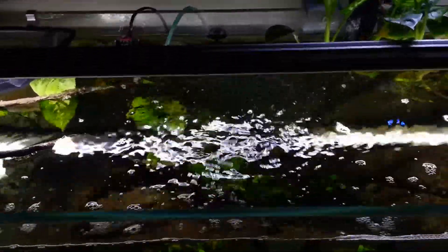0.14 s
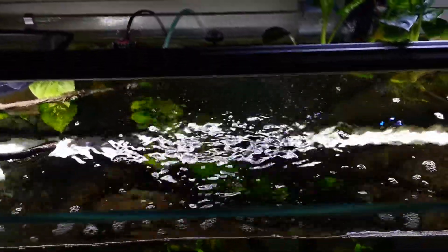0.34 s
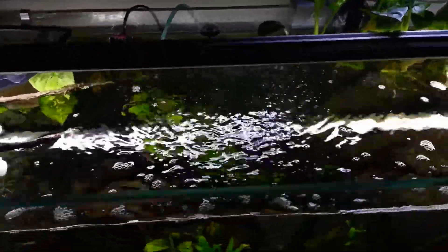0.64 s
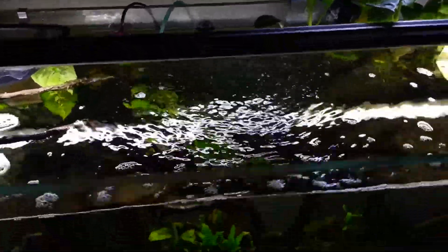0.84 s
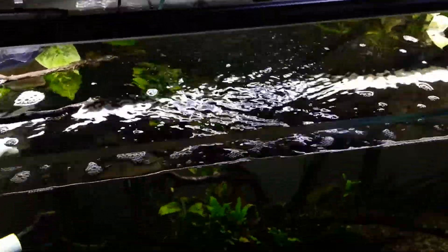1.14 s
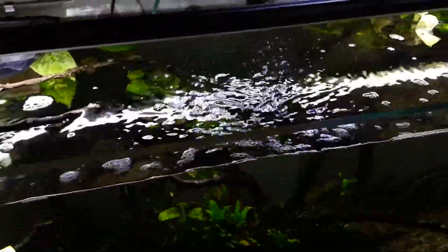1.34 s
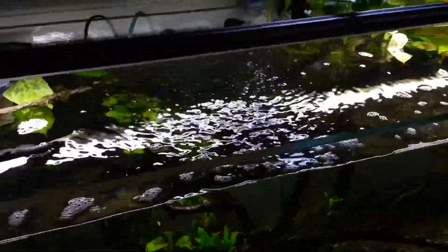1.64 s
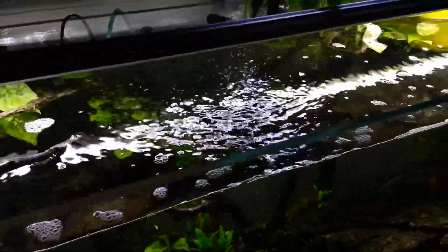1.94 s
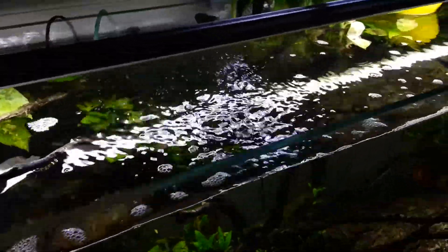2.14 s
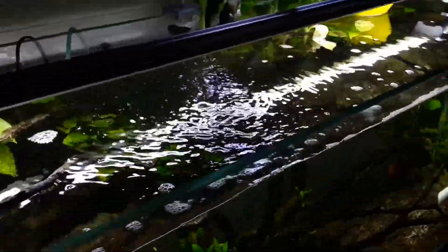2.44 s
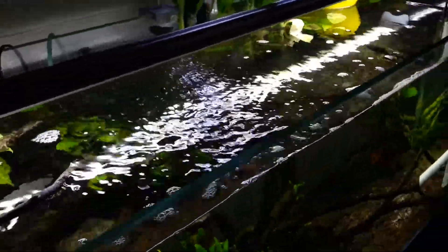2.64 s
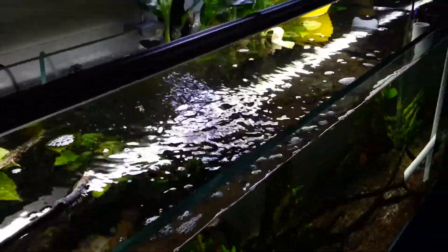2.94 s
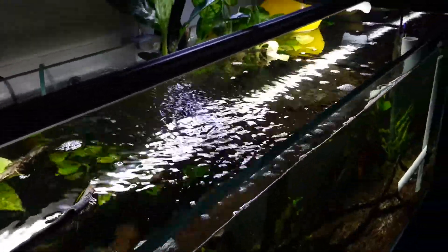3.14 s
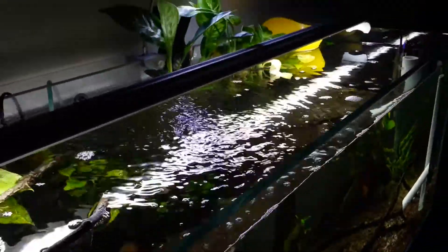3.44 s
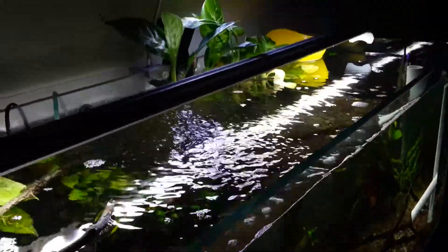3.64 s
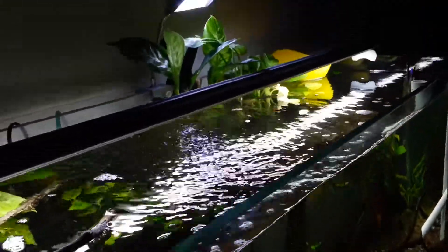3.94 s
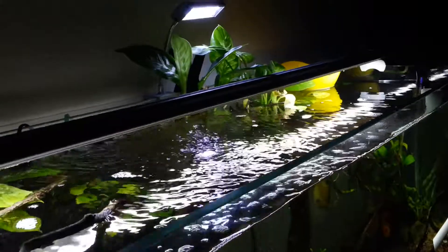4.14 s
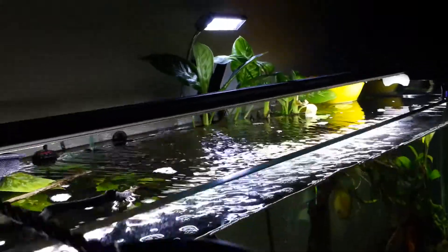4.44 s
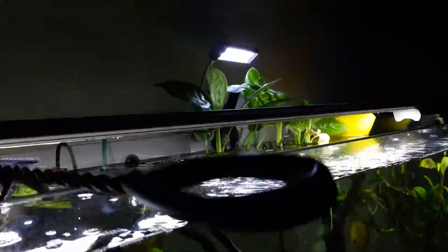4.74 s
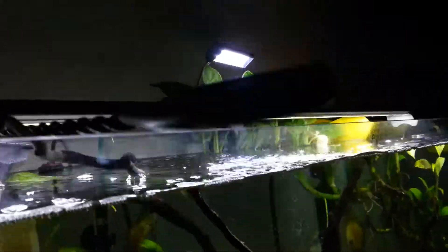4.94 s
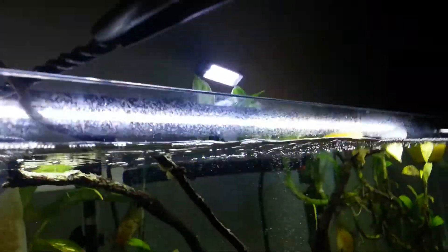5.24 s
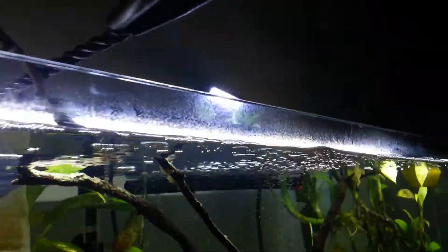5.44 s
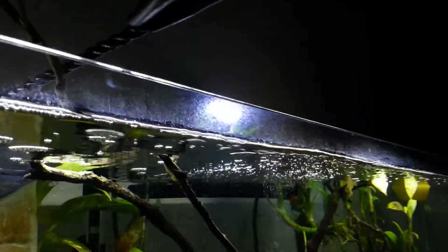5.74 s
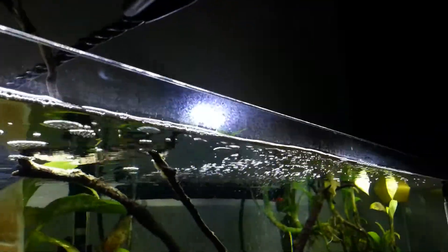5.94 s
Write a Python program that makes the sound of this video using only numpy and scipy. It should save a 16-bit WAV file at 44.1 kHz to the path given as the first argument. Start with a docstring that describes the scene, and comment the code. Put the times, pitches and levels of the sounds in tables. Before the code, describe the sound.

Close above an aquarium, a filter outflow churns the surface: fine, fluttering spray and coarser babble over a quiet, steady pump hum and low rumble. Sharp drops tick on both sides and soft air pockets plop, one crisp drop near 0.1 s. The patter strengthens around 1 s, and at 1.8 s a small splash with a slap fizzes briefly. A very faint, hissy whistle hangs from about 2.2 s while the flow falters and catches. At 3.1 s a quick string of low glugs runs on the right, then a short swish at 3.4 s. At 4.3 s a far harder slap cracks, with a fizzing tail. By 4.9 s the surface is almost calm. Hollow, boomy bumps strike in pairs at 5.5 and 5.9 s, with plops, glassy splashes and renewed churning; the tank wall groans unsteadily until the end at about 6.1 s.

```python
"""Over a steady pump hum and low rumble, a filter outflow churns an aquarium: spray patters, drops tick, air plops.
A splash with a slap comes before two seconds, then a thin whistle, a string of glugs and a brief swish.
A much harder slap with a long fizzing tail follows after four seconds, and the surface then calms.
Near the end, two close pairs of hollow bumps shake air loose amid more splashes, and the tank wall groans.
Water sounds are filtered noise and grains; air pockets and solid parts ring as decaying tones."""
import sys
import numpy as np
from scipy import signal
from scipy.fft import rfft, irfft
from scipy.io import wavfile
from scipy.ndimage import map_coordinates

SR = 44100
rng = np.random.default_rng(int(sys.argv[2]) if len(sys.argv) > 2 else 0)


def unload_wav(signal):
    """Save mono or channel-first audio to the path in sys.argv[1] as 16-bit WAV at rate SR, clipped to [-1, 1]."""
    wavfile.write(
        sys.argv[1],
        SR,
        np.round(np.clip(np.atleast_2d(signal).T, -1, 1) * 32767).astype(np.int16),
    )


N = 268128
TIME = np.arange(N) / SR  # s

# Levels below are starting levels: gains and filters act on them later. Positive left-right dB leans left.
# How hard the outflow churns the surface: t/s, fine spray level/dB, coarser babble level/dB
CHURN_CURVE = [(0, -54.5, -65), (0.66, -59.5, -68.5), (0.9, -55, -58.5), (1.1, -51.5, -58.5),
               (1.52, -59.5, -62), (1.8, -50, -63.5), (2.25, -59, -67), (2.5, -57.5, -64),
               (2.7, -59, -66.5), (2.92, -64.5, -68.5), (3.15, -57.5, -61), (3.3, -60, -64),
               (4.0, -58, -63), (4.68, -64.5, -59.5), (4.9, -84, -79.5), (5.17, -75, -69.5),
               (5.26, -68, -60), (6.08, -54, -49)]
# Moments when the flow falters, then catches again: t/s of the catch, lull depth/dB
FLOW_FALTERS = [(2.068, 20), (2.135, 12), (2.502, 14), (2.565, 15), (3.667, 18), (4.135, 7)]
# Larger drops on the surface: t/s, level/dB, left-right/dB
LARGE_DROPS = [(0.0547, -56, -16), (0.0832, -29.5, -6), (0.9765, -37.5, 17), (1.22, -31, 16),
               (1.34, -37.5, 11), (1.3665, -34.5, 2), (1.5394, -35, 8), (1.67, -38.5, 1),
               (1.7688, -26.5, -16), (2.349, -38, 5), (2.503, -45, 4), (2.572, -42.5, 32.5),
               (2.6932, -33.5, 5), (2.986, -49, -29), (3.028, -47, -25), (3.101, -30.5, 8.5),
               (3.228, -37, -17), (3.61, -35, -5), (3.667, -47, -6), (4.148, -33.5, -3), (4.205, -29.5, 0),
               (4.277, -33.5, 19), (4.692, -42, -11)]
# Larger air pockets: t/s, level/dB, f/Hz, left-right/dB
LARGE_POCKETS = [(0.091, -38, 227, 11), (0.118, -38.5, 229, 12.5), (0.853, -42.5, 200, 7),
                 (1.132, -43, 272, 13), (1.344, -38, 343, 10.5), (1.65, -42.5, 254, 3),
                 (2.285, -38, 204, 10), (2.299, -42, 640, -18), (2.324, -41.5, 467, 7),
                 (2.499, -42.5, 480, -9), (2.635, -42, 200, 11.5), (2.76, -46.5, 195, -7),
                 (2.832, -43.5, 324, -9), (2.855, -48, 201, -11), (2.946, -42, 195, 11),
                 (2.983, -38.5, 312, -11.5), (3.757, -46, 306, 3), (4.32, -31.5, 331, 1.5),
                 (4.634, -43.5, 190, 8.5)]
# Sharp slaps of water: t/s, level/dB, left-right/dB
WATER_SLAPS = [(1.786, -32, -3), (4.3223, -3, 2)]
# Splashes: t/s, level/dB, swell/s, hold/s, t60/s (time to fall 60 dB), left-right/dB,
# low wash level/dB and ringing of the glass level/dB, both relative to the splash
SPLASH_EVENTS = [(1.782, -39, 0.071, 0.01, 0.42, -1, -16, -14),
                 (1.927, -50, 0.056, 0.02, 0.23, -3, -36, -17),
                 (4.321, -29.5, 0.065, 0.033, 0.79, -0.5, -16.5, -19),
                 (5.011, -59, 0.035, 0.013, 0.21, -4.5, -12, -12),
                 (5.376, -58, 0.14, 0.023, 0.3, 1, -4, -6), (5.519, -36, 0.029, 0.088, 0.84, 3, -2.5, 1.5),
                 (5.872, -37, 0.0033, 0.0097, 0.59, 3.5, -20.5, -7),
                 (5.983, -44, 0.05, 0.015, 0.52, -1, -15.5, 0.5)]
# Bumps against the tank: t/s, level/dB, hold/s, t60/s, low limit f/Hz, ring level/dB relative to the bump
TANK_BUMPS = [(5.505, -27, 0.0087, 0.43, 55, -11), (5.582, -40, 0.0078, 0.91, 115, -7.5),
              (5.87, -24.5, 0.0055, 0.28, 196, -8.5), (5.915, -32.5, 0.052, 0.56, 229, -6.5)]
# Groan of the tank wall around the last bumps: t/s, f/Hz, level/dB
WALL_GROAN = [(5.86, 205, -71), (5.895, 203.8, -37), (5.927, 190.5, -25.5), (5.96, 298, -38),
              (5.995, 303.4, -32), (6.04, 253, -30.5), (6.08, 229, -52)]

# Low tones in which the tank rings: f/Hz, level/dB, t60/s
TANK_MODES = [(130.4, -18, 0.58), (206.6, 2.5, 0.39), (247, -16, 0.55), (315, -18, 0.24), (359, -4.5, 0.21),
              (588, -24, 0.12), (713, -12, 0.14)]
# High tones in which its glass rings: f/Hz, level/dB, t60/s
GLASS_MODES = [(1162, -10, 0.017), (2113, -19.5, 0.05), (2902, -10, 0.068), (3390, -11.5, 0.028),
               (4980, -11.5, 0.1), (5400, -11.5, 0.055), (6080, -10.5, 0.015), (6713, -7, 0.036),
               (7700, -21, 0.056)]
# Steady tones of the pump: f/Hz, level/dB (rms)
PUMP_TONES = [(60, -71), (120, -79.5), (180, -68), (300, -81), (361, -78.5), (598, -90.5), (780, -93.5)]

# Spectrum of the fine spray: f/Hz, level/dB
SPRAY_SPECTRUM = [(1800, -43), (3000, -10.5), (4200, -9.5), (4900, -5.5), (5500, -0.5), (6300, -0.5),
                  (7150, 1), (8700, -6.5), (11000, -6), (14000, -9.5), (15500, -33)]
# Spectrum of the coarser babble: f/Hz, level/dB
BABBLE_SPECTRUM = [(290, -29.5), (500, -3.5), (756, -2.5), (829, -5.5), (892, -6.5), (1790, -5.5),
                   (2790, -3.5), (3640, -8.5), (4500, -3), (5850, -38), (9900, -120)]
# Spectrum of the fizz of a splash: f/Hz, level/dB
FIZZ_SPECTRUM = [(600, -14), (1000, -18), (1450, -3), (2100, -1.5), (2900, 3), (3600, -1), (4500, -5),
                 (5600, 2), (6800, 2), (8500, -11), (11000, -16.5), (15000, -96)]
# Spectrum of the low wash under a splash: f/Hz, level/dB
WASH_SPECTRUM = [(24, -26), (40, -10), (65, -0.5), (87, -16), (177, -1), (455, -5), (497, -8.5),
                 (1300, -16.5), (1690, -48.5), (2860, -120)]
# Spectrum of the swish of water: f/Hz, level/dB
SWISH_SPECTRUM = [(900, -24), (1700, -21.5), (2250, -11), (2700, -12), (4300, -19), (6000, -15),
                  (7000, -11), (8200, -23.5), (12000, -24), (15000, -59)]
# Spectrum of a slap: f/Hz, level/dB
SLAP_SPECTRUM = [(300, -23), (1100, -23), (1750, 2), (2600, -4), (4200, -11), (5600, 4), (6600, -2),
                 (8200, -15), (14000, -30)]
# Spectrum of the boom of a bump: f/Hz, level/dB
BOOM_SPECTRUM = [(30, -17), (65, -4), (90, -12), (125, -2), (200, -3.5), (290, -0.5), (370, -1.5),
                 (470, -9.5), (620, -7.5), (780, -20.5), (960, -31), (1500, -39), (2500, -65)]
# Spectrum of the rumble under the hum: f/Hz, level/dB
RUMBLE_SPECTRUM = [(20, -12.5), (45, -7.5), (65, 0.5), (90, -12), (130, -8.5), (180, -4), (240, -7),
                   (340, -5), (450, -14.5), (800, -19), (1300, -20.5), (2500, -27.5)]
# How splashes divide between the sides: f/Hz, left-right/dB
SPLASH_BALANCE = [(700, -7), (1300, 1.5), (2400, 9.5), (4400, 10), (6000, -2), (8000, -6), (14000, -4)]
# How spray divides between the sides: f/Hz, left-right/dB
SPRAY_BALANCE = [(60, -16), (110, 21), (200, -7), (380, 2.5), (700, 4.5), (1290, 4), (2380, 9.5),
                 (4400, 9.5), (8120, -10), (15000, 1)]

# How fast the flow sinks before it catches, and the size and length of the spurt after
SAG_S, SPURT_DB, SPURT_S = .028, 2, .02
# Every larger drop throws up a puff of spray, weaker than the drop
PUFF_DB, PUFF_SWELL_S, PUFF_T60_S = -20, .015, .14
# Small drops fall at random
SMALL_DROPS_PER_S, SMALL_DROP_OVER_SPRAY_DB, DROP_SIDE_SPREAD_DB = 3, 14, 9
# A string of air pockets glugs out on the right, tending to sink in pitch
GLUG_START_S, GLUG_GAP_S, GLUG_DB, GLUG_SIDE_DB = 3.072, .021, -38.5, -14.5
GLUG_FIRST_HZ, GLUG_LAST_HZ, GLUG_FADE_DB = 367, 220, 4
# Small pockets burst at random within this span
SMALL_PLOP_SPAN_S, SMALL_PLOP_DB, SMALL_PLOP_HZ, PLOP_SIDE_SPREAD_DB = (0.94, 3.7), -53, 215, 11.5
# Each bump shakes a big pocket loose
BUMP_PLOP_OVER_DB, BUMP_PLOP_HZ = 4, 335
SLAP_T60_S, SPLASH_FLUTTER_DB = .006, .7
SWISH_S, SWISH_LEVEL_DB = 3.375, -46.5
SWISH_SWELL_S, SWISH_HOLD_S, SWISH_T60_S = .14, .088, .2
WHISTLE_S, WHISTLE_LEVEL_DB, WHISTLE_HZ = 2.2, -72, 4270
WHISTLE_SWELL_S, WHISTLE_HOLD_S, WHISTLE_T60_S = .3, .55, 1.2
WHISTLE_RING_S = .028  # the shorter it rings, the more like a hiss
CUTOFF_HZ = 14650


def from_db(db):
    """Decibels to gain."""
    return 10 ** (np.asarray(db) / 20)


def rms_one(x):
    """Scale to an rms (average strength) of one."""
    return x / np.sqrt(np.mean(x ** 2) + 1e-20)


def in_time(rows):
    """Each column of a curve, sample by sample."""
    s, *columns = np.transpose(rows)
    return [np.interp(TIME, s, column) for column in columns]


def pan(db):
    """Left and right gains for a level difference."""
    return from_db(np.array([[.5], [-.5]]) * db)


def drift(rate):
    """Smooth random wander of spread 1, through `rate` random points per second."""
    knots = rng.standard_normal(4000)
    wander = map_coordinates(knots, [TIME[::20] * rate], order=3, mode="wrap")
    return rms_one(wander).repeat(20)[:N]


def colour(x, spectrum, sides=((100, 0), (1000, 0))):
    """Filter of unit power gain with the given spectrum and left-right balance, with no sound ahead of time."""
    size = 4096
    log_hz = np.log(np.maximum(np.arange(size // 2 + 1) * SR / size, 1))
    curves = [np.transpose(points) for points in (spectrum, sides)]
    level_db, side_db = [np.interp(log_hz, np.log(hz), db) for hz, db in curves]
    # folding the cepstrum (spectrum of the log spectrum) makes the filter respond as early as it can
    cepstrum = irfft(np.log(from_db(level_db) * pan(side_db)))
    cepstrum[:, 1:size // 2] *= 2
    cepstrum[:, size // 2 + 1:] = 0
    response = rms_one(irfft(np.exp(rfft(cepstrum)))) / np.sqrt(size)
    return signal.fftconvolve(x * np.ones((2, 1)), response, axes=1)[:, :N]


def stereo_noise(alike):
    """White noise; `alike` is the share of power common to the two sides."""
    shared = np.sqrt(alike) * rng.standard_normal(N)
    return shared + np.sqrt(1 - alike) * rng.standard_normal((2, N))


def grains(per_s, spread_db):
    """Tiny clicks of uneven size at random moments, reaching each side with its own strength."""
    born = rng.random(N) < per_s / SR
    sizes = from_db(spread_db * np.minimum(rng.exponential(1, N), 4))
    return rms_one(born * sizes * rng.standard_normal((2, N)))


def ring(x, hz, t60):
    """One mode: x sets off a tone that falls 60 dB in t60 seconds."""
    r, w = from_db(-60 / (t60 * SR)), 2 * np.pi * hz / SR
    return signal.lfilter([0, np.sin(w)], [1, -2 * r * np.cos(w), r * r], x + 1e-18)


def fade(age, t60):
    """Gain that falls 60 dB in t60 seconds."""
    return np.exp(-np.log(1000) * age / t60)


def surge(s, swell, hold, t60):
    """Gain that swells by 30 dB per swell time up to time s, holds, then dies away."""
    rise_db = -30 * np.maximum(s - TIME, 0) / swell
    fall_db = -60 * np.maximum(TIME - s - hold, 0) / t60
    return from_db(np.maximum(rise_db + fall_db, -200))


def cracks(rows, t60, tail_db, tail_t60, rise_s):
    """Very short bursts of random signs, each with a scatter of noise that dies away."""
    out, age = np.zeros((2, N + SR)), np.arange(SR // 5) / SR
    burst, scatter = fade(age, t60), from_db(tail_db) * fade(age, tail_t60)
    attack = 1 - np.exp(-age / rise_s)
    for s, level_db, side_db in rows:
        at = round(s * SR)
        crack = burst * rng.choice([-1, 1], (2, len(age)))
        crack = crack + scatter * rng.standard_normal((2, len(age)))
        out[:, at:at + len(age)] += from_db(level_db) * pan(side_db) * attack * crack
    return out[:, :N]


def pump(rumble_db=-64.5, waver_db=1.0, phase_waver=0.41):
    """Mains hum that wavers a little in level and phase, in a low rumble that follows the churning."""
    hum = 0
    for hz, level_db in PUMP_TONES:
        gain = from_db(level_db + waver_db * drift(20)) * np.sqrt(2)
        hum = hum + gain * np.sin(2 * np.pi * hz * TIME + phase_waver * drift(3.09))
    spray_db = in_time(CHURN_CURVE)[0]
    follow_db = 0.15 * (spray_db - np.median(spray_db))
    rumble = from_db(rumble_db + follow_db + 4.4 * drift(35)) * stereo_noise(0.55)
    return hum + colour(rumble, RUMBLE_SPECTRUM)


def whistle(waver_db=2):
    """A thin, unsteady whistle in the outflow: noise through one narrow mode swells, holds and fades."""
    gain = from_db(WHISTLE_LEVEL_DB + waver_db * drift(24.83))
    gain = gain * surge(WHISTLE_S, WHISTLE_SWELL_S, WHISTLE_HOLD_S, WHISTLE_T60_S)
    return gain * rms_one(ring(stereo_noise(0.068), WHISTLE_HZ, WHISTLE_RING_S))


def groan():
    """The tank wall groans: a tone of gliding, unsteady pitch and level."""
    hz, level_db = in_time(WALL_GROAN)
    gain = from_db(level_db + 2.9 * drift(70))
    turns = np.cumsum(hz * (1 + 0.08 * drift(90))) / SR
    return gain * np.sin(2 * np.pi * turns) * (TIME > WALL_GROAN[0][0])


def bumps(judder_db=0.0):
    """Each bump is a sudden push of noise that booms in the tank and leaves its modes ringing."""
    boom, drive = 0, 0
    for s, level_db, hold, t60, low_hz, ring_db in TANK_BUMPS:
        # a judder of 0 dB leaves the push steady
        gain = from_db(level_db + judder_db * drift(130))
        push = gain * surge(s, 0.00067, hold, t60) * stereo_noise(0.83)
        no_bass = signal.butter(2, low_hz, "high", fs=SR, output="sos")
        boom = boom + signal.sosfilt(no_bass, push)
        drive = drive + from_db(ring_db) * push
    rings = sum(from_db(level_db) * rms_one(ring(drive, hz, t60)) for hz, level_db, t60 in TANK_MODES)
    return colour(boom, BOOM_SPECTRUM) + from_db(0.5) * np.std(drive) * rings + groan()


def glass_ringing():
    """Steady noise sets the high modes of the glass ringing, each with its own place between the sides."""
    side_hz, side_db = np.transpose(SPLASH_BALANCE)
    glass = 0
    for hz, level_db, t60 in GLASS_MODES:
        mode = pan(np.interp(hz, side_hz, side_db)) * ring(stereo_noise(0.045), hz, t60)
        glass = glass + from_db(level_db) * rms_one(mode)
    return glass


def slaps():
    """Each slap of water is a sharp burst of noise, over within a few milliseconds."""
    bursts = cracks(WATER_SLAPS, t60=SLAP_T60_S, tail_db=0, tail_t60=SLAP_T60_S, rise_s=.0005)
    return colour(bursts, SLAP_SPECTRUM, SPLASH_BALANCE)


def swish():
    """A brief swish of water: dense grains swell, hold and fall away."""
    gain = from_db(SWISH_LEVEL_DB) * surge(SWISH_S, SWISH_SWELL_S, SWISH_HOLD_S, SWISH_T60_S)
    return colour(gain * grains(per_s=4900, spread_db=1), SWISH_SPECTRUM, SPRAY_BALANCE)


def splashes(steady_glass_db=-8):
    """Dense fizz of falling spray above a low wash, with slaps and a swish; all the water rings the glass."""
    fizz, wash = 0, 0
    on_glass = from_db(in_time(CHURN_CURVE)[1] + steady_glass_db)
    for s, level_db, swell, hold, t60, side_db, wash_db, glass_db in SPLASH_EVENTS:
        gain = from_db(level_db) * surge(s, swell, hold, t60)
        # hypot adds the powers of overlapping splashes
        fizz = np.hypot(fizz, gain * pan(side_db))
        wash = np.hypot(wash, gain * from_db(wash_db))
        on_glass = np.hypot(on_glass, gain * from_db(glass_db))
    fizz = fizz * from_db(SPLASH_FLUTTER_DB * drift(120)) * grains(per_s=22000, spread_db=1)
    solid = on_glass * glass_ringing() + slaps() + swish()
    return solid + colour(fizz, FIZZ_SPECTRUM, SPLASH_BALANCE) + colour(wash * stereo_noise(0.78), WASH_SPECTRUM)


def glug(count=10, jitter_s=0.00397, spread_db=2.0, pitch_spread=0.29):
    """A quick, uneven string of air pockets that tends to weaken: t/s, level/dB, f/Hz, left-right/dB."""
    late, loud, high = rng.standard_normal((count, 3)).T
    times = GLUG_START_S + GLUG_GAP_S * np.arange(count) + jitter_s * late
    levels = GLUG_DB - np.linspace(0, GLUG_FADE_DB, count) + spread_db * loud
    pitches = np.geomspace(GLUG_FIRST_HZ, GLUG_LAST_HZ, count) * np.exp(pitch_spread * high)
    return [(s, level_db, hz, GLUG_SIDE_DB) for s, level_db, hz in zip(times, levels, pitches)]


def small_plops(count=9, pitch_spread=0.13):
    """Faint air pockets at random moments: t/s, level/dB, f/Hz, left-right/dB."""
    times = rng.uniform(*SMALL_PLOP_SPAN_S, count)
    high, side = rng.standard_normal((count, 2)).T
    pitches = SMALL_PLOP_HZ * np.exp(pitch_spread * high)
    sides = PLOP_SIDE_SPREAD_DB * side
    return [(s, SMALL_PLOP_DB, hz, side_db) for s, hz, side_db in zip(times, pitches, sides)]


def air_pockets():
    """All pockets: large, glugging, small, and those shaken loose by the bumps."""
    shaken = [(s, level_db + BUMP_PLOP_OVER_DB, BUMP_PLOP_HZ, 0) for s, level_db, *_ in TANK_BUMPS]
    return LARGE_POCKETS + glug() + small_plops() + shaken


def plops(cycles=5.5, splat_db=-10, splat_t60=0.082, thud_db=-12, thud_hz=120, gain_db=-1.5):
    """Each air pocket rings for a few cycles, rising in pitch, inside a short dull splat and a soft thud."""
    out, age = np.zeros((2, N + SR)), np.arange(SR // 8) / SR
    dull = signal.butter(2, [110, 700], "band", fs=SR, output="sos")
    thud = 2 * from_db(thud_db) * np.sin(2 * np.pi * thud_hz * age) * np.exp(-age / 0.0024)
    for s, level_db, hz, side_db in air_pockets():
        swell = (1 - np.exp(-age / 0.0028)) * fade(age, cycles / hz)
        tone = 2 * swell * np.sin(2 * np.pi * hz * age * (1 + 6 * age))
        splat = rms_one(signal.sosfilt(dull, rng.standard_normal(len(age)))) * fade(age, splat_t60)
        plop = tone + thud + from_db(splat_db) * splat
        at = round(s * SR)
        out[:, at:at + len(age)] += from_db(level_db + gain_db) * pan(side_db) * plop
    return out[:, :N]


def churning():
    """Levels of spray and babble in dB: each falter sinks into a lull and ends in a short spurt."""
    dip_db = 0
    for s, depth_db in FLOW_FALTERS:
        away = np.abs(TIME - s)
        lull_db, spurt_db = -depth_db * np.exp(-away / SAG_S), SPURT_DB * np.exp(-away / SPURT_S)
        dip_db = dip_db + np.where(TIME < s, lull_db, spurt_db)
    return [level_db + dip_db for level_db in in_time(CHURN_CURVE)]


def small_drops():
    """Drops at random moments, stronger where the spray is: t/s, level/dB, left-right/dB."""
    spray_db = in_time(CHURN_CURVE)[0]
    at = np.flatnonzero(rng.random(N) < SMALL_DROPS_PER_S / SR)
    side_db = DROP_SIDE_SPREAD_DB * rng.standard_normal(N)
    return list(zip(TIME[at], spray_db[at] + SMALL_DROP_OVER_SPRAY_DB, side_db[at]))


def tiny_bubbles():
    """Tiny bubbles ping: sparse grains set off tones that die away within 45 cycles."""
    pitches = np.geomspace(2300, 9500, num=26)
    return rms_one(sum(ring(grains(per_s=14, spread_db=7.5), hz, 45 / hz) for hz in pitches))


def surface(spray_gain_db=0.5, babble_gain_db=-1, flutter_db=2.02, slosh_db=2.2, slosh_rate=15,
            drop_db=-5, ping_db=-10, puff_babble_db=-5):
    """Spray and babble are dense grains that come in clumps, with single drops and pinging bubbles among them."""
    spray_db, babble_db = churning()
    puffs = 0
    for s, level_db, _ in LARGE_DROPS:
        puffs = puffs + from_db(level_db + PUFF_DB) * surge(s, PUFF_SWELL_S, 0, PUFF_T60_S)
    slosh = slosh_db * drift(slosh_rate)
    flutter = 0.56 * drift(55) + .6 * drift(220)
    clumps = from_db(slosh + flutter_db * flutter)
    spray_gain = np.hypot(from_db(spray_db + spray_gain_db), puffs)
    spray = spray_gain * clumps * grains(per_s=14000, spread_db=3.5)
    babble_gain = np.hypot(from_db(babble_db + babble_gain_db), from_db(puff_babble_db) * puffs)
    babble = babble_gain * clumps * grains(per_s=6000, spread_db=1)
    drops = cracks(LARGE_DROPS + small_drops(), t60=.013, tail_db=-14, tail_t60=.06, rise_s=.0008)
    drops = from_db(drop_db) * drops
    pings = from_db(spray_db + ping_db) * tiny_bubbles()
    fine = colour(spray + drops + pings, SPRAY_SPECTRUM, SPRAY_BALANCE)
    return fine + colour(babble + 0.34 * drops, BABBLE_SPECTRUM, SPRAY_BALANCE)


def scene():
    """Everything heard close above the tank."""
    return surface() + whistle() + plops() + splashes() + bumps() + pump()


def record(dry):
    """The deepest bass is thinned, high peaks are rounded and the top is cut steeply."""
    bass_cut = signal.butter(2, 40, "high", fs=SR, output="sos")
    rounded = np.tanh(signal.sosfilt(bass_cut, dry))
    top_cut = signal.ellip(10, .3, 70, CUTOFF_HZ, fs=SR, output="sos")
    return signal.sosfilt(top_cut, rounded)


dry = scene()
out = record(dry)
unload_wav(out)
```